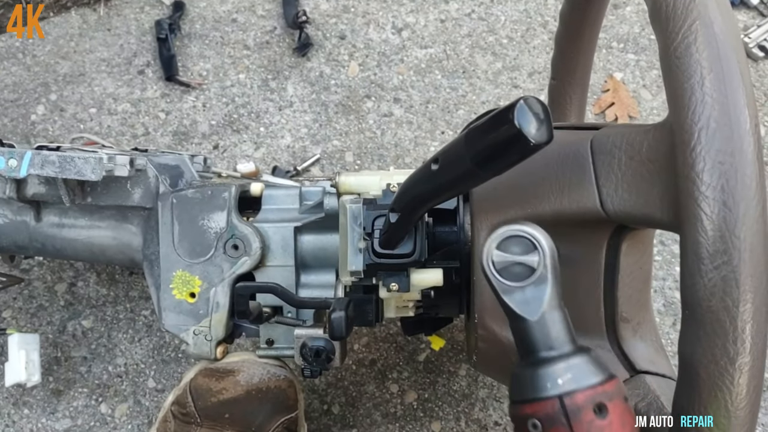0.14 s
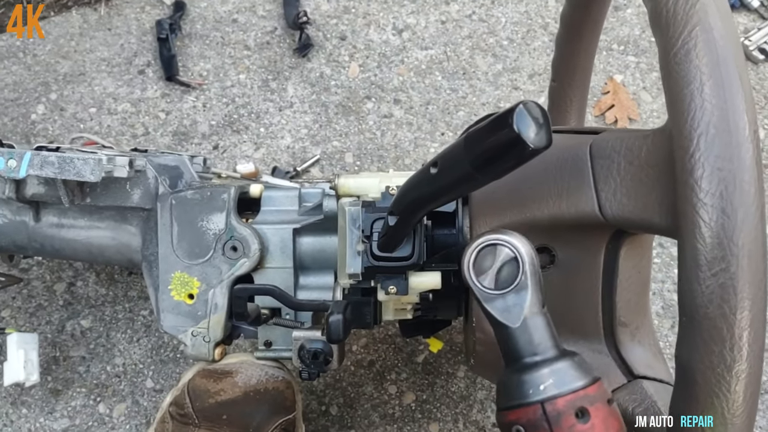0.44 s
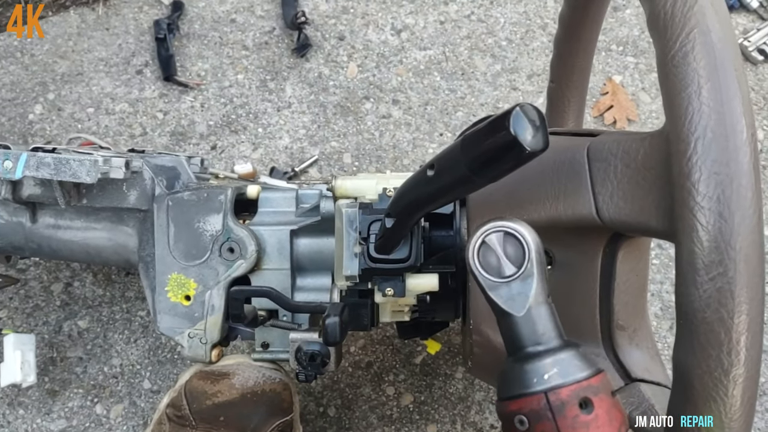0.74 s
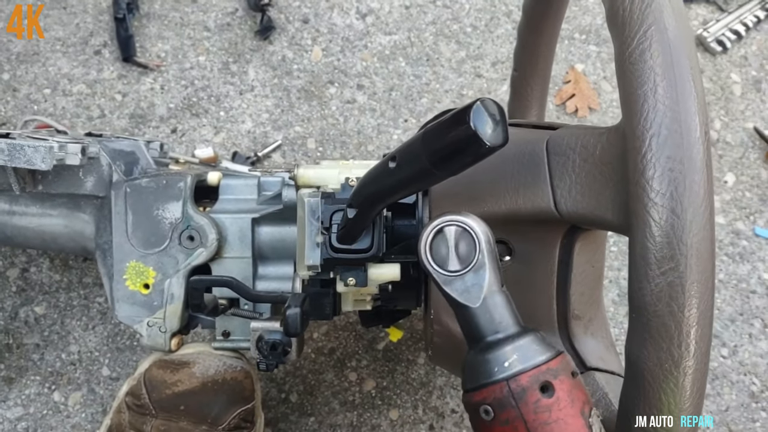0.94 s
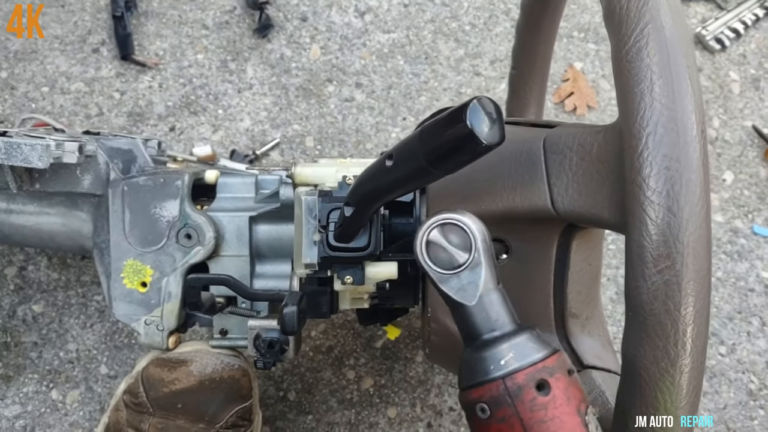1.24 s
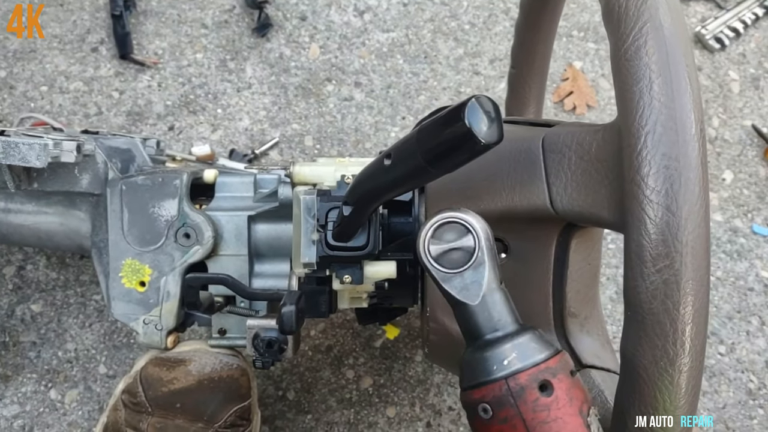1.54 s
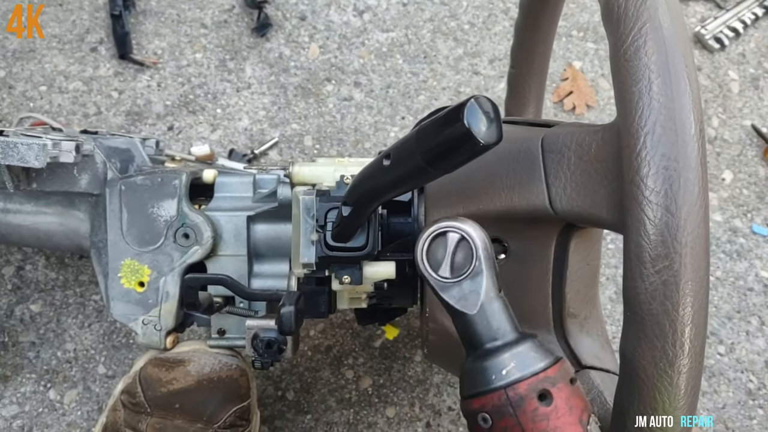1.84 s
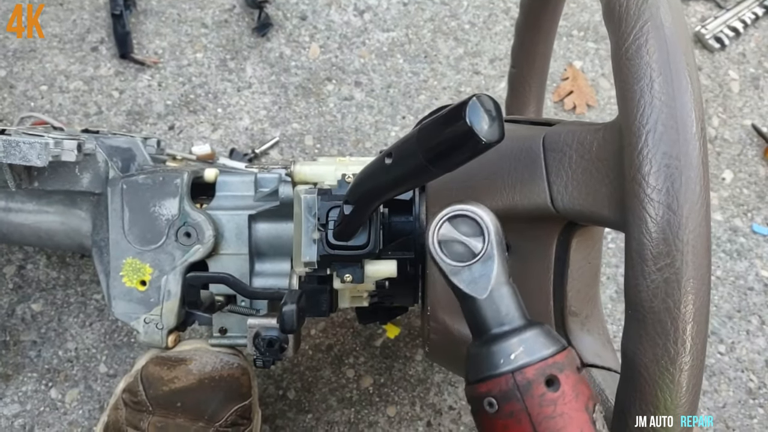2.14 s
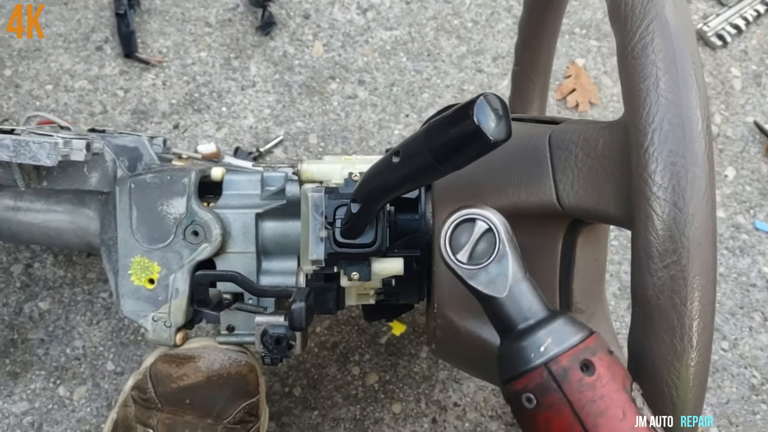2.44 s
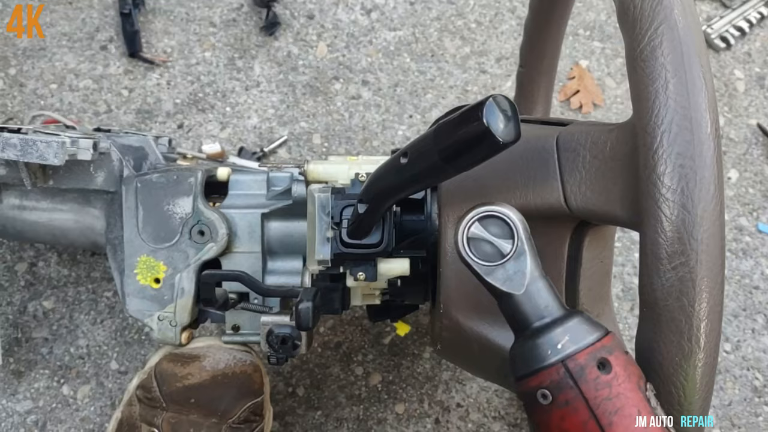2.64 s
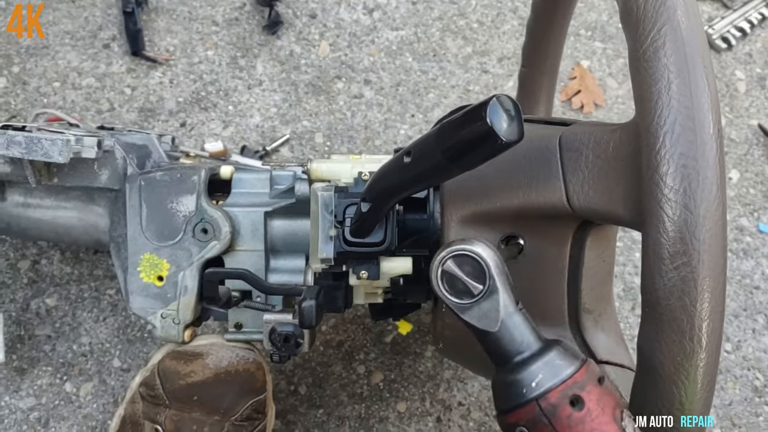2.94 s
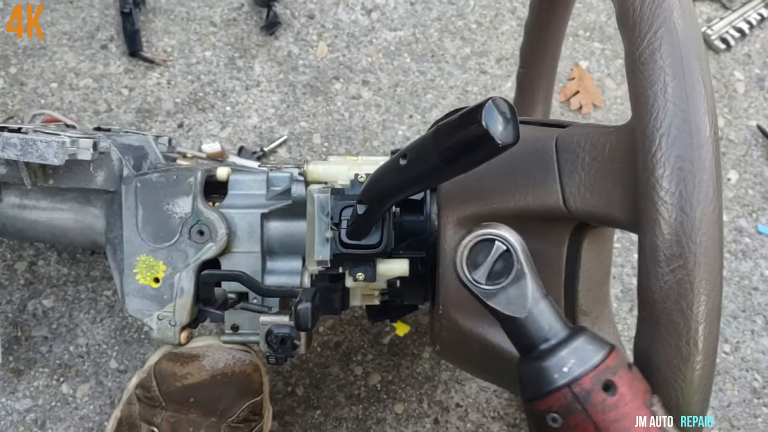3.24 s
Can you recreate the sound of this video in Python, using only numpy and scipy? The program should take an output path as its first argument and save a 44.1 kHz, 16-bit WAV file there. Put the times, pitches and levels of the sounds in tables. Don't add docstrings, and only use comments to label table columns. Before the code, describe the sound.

Close up outdoors, an electric ratchet makes a long harsh buzzing run, a short second burst and a third run that winds down to clattering knocks, over barely audible yard air, with little echo.

```python
import sys
import numpy as np
from scipy import signal
from scipy.fft import rfft, irfft, next_fast_len
from scipy.io import wavfile
from scipy.ndimage import uniform_filter1d

SR = 44100
rng = np.random.default_rng(int(sys.argv[2]) if len(sys.argv) > 2 else 0)


def gain_from_decibels(decibels):
    exponent = np.asarray(decibels, float) / 20
    return 10 ** exponent


def bounce(signal):
    frames = np.transpose(np.atleast_2d(signal))
    limited = np.clip(frames, -1, 1)
    pcm = np.round(limited * 32767).astype(np.int16)
    wavfile.write(sys.argv[1], SR, pcm)


N = 149940
SIZE = next_fast_len(N + 8192, True)
T, HZ = np.arange(N) / SR, np.fft.rfftfreq(SIZE, 1 / SR)


def evened(x):
    return x / np.sqrt(np.mean(x ** 2) + 1e-20)


def curve(points, axis=1):
    columns = np.transpose(points)
    return np.interp(T, columns[0], columns[axis])


def read(points):
    f, value = np.transpose(points)
    return np.interp(np.log(HZ + 1), np.log(f + 1), value)


def bell(hz, width):
    return 1 / np.sqrt(1 + (2 * (HZ - hz) / width) ** 2)


def colour(x, gain):
    return irfft(rfft(x, SIZE) * gain, SIZE)[..., :N]


def noise():
    return rng.standard_normal((2, N))


def drift(hz):
    return evened(colour(rng.standard_normal(N), bell(0, 2 * hz) ** 2))


def steps(count):
    return rng.standard_normal(4000)[count.astype(int) % 4000]


# [hz, level_db per Hz]
YARD_TONE = [(18, -32), (30, -7), (680, -5), (837, -9), (1200, -10), (1780, -8), (15000, -48)]


def yard():
    return gain_from_decibels(-57.5) * evened(colour(noise(), gain_from_decibels(read(YARD_TONE))))


# [time_s, speed_turns_per_s]
CRANK_SPEED = [(0.085, 0), (0.1, 31.36), (0.15, 59.87), (0.22, 75.76), (1.75, 75.81), (1.85, 65.24),
               (1.95, 48.37), (2.09, 35.29), (2.15, 69.0), (2.22, 75.13), (2.31, 74.37), (2.44, 51.65),
               (2.46, 77.25), (2.96, 77.15), (3.1, 54.88), (3.25, 33.21), (3.4, 17.88)]
# [time_s, drive_effort_db, yoke_slack_db, steel_rub_db]
LOAD = [(.096, -31, -4, 4), (.13, -30, 2, -2), (.2, -22, -20, -3.5), (.54, -21.5, -8, -4.5),
        (.63, -21.5, -2, -4.5), (1.82, -21, 2, -4), (1.87, -25.5, 6, 4), (2.1, -29, -13, 7),
        (2.115, -24, -4, 5), (2.31, -19, -1.5, -4.5), (2.335, -23.5, -3, -2), (2.44, -25, 5.5, 0),
        (2.47, -21.5, 8, -5), (2.82, -21.5, -20, -10), (2.87, -19.5, -2.5, -7), (3.07, -24, 6.5, -2),
        (3.1, -25.5, 4.5, 1), (3.4, -33, 7.5, 4)]


def crank():
    speed = curve(CRANK_SPEED)
    effort_db = curve(LOAD) - 60 * (T < LOAD[0][0])
    return np.cumsum(speed) / SR, speed, effort_db


# [pitch_hz, level_db]
SWITCH_WHINE = [(3688, -64), (4926, -77), (5512, -70), (7364, -78), (9259, -88), (11025, -87), (12888, -83)]
# [time_s, level_db, length_s, centre_hz]
TRIGGER_TICKS = [
    (0.041, -57, .002, 4930),
    (.046, -49, 0.0073, 250),
    (0.069, -51, 0.0063, 6900),
    (0.086, -27.5, 0.0044, 4500),
    (.097, -25, .0015, 11000),
    (0.124, -25, 0.0015, 1450),
    (0.135, -19, 0.0025, 1180),
    (2.501, -23, 0.02, 1120),
]


def trigger():
    on_s, off_s, fade_s = 0.046, 0.066, 0.004
    whining = np.clip(np.minimum(T - on_s, off_s - T) / fade_s, 0, 1)
    whine = sum(gain_from_decibels(db + 3) * np.sin(2 * np.pi * hz * T) for hz, db in SWITCH_WHINE)
    out = whining * whine * np.ones((2, 1))
    for start_s, db, length_s, hz in TRIGGER_TICKS:
        tone = bell(hz, 0.9 * hz) ** 2 * np.minimum(2 * HZ / hz, 1) ** 2
        out += gain_from_decibels(db) * evened(colour(noise(), tone)) * np.exp(-((T - start_s) / length_s) ** 2)
    return out


# [centre_hz, width_hz]
SHAKE = [(53, 44), (80, 8.5), (115, 21)]
# [multiple of crank speed, level_db]
ORDERS = [(4, -51.5), (5, -54), (6, -46), (7, -45), (10, -46), (12, -41), (13, -42)]


def hum(turns, speed):
    shaky = turns + 0.012 * drift(hz=42)
    tones = np.zeros(N)
    for multiple, db in ORDERS:
        wave = np.sin(2 * np.pi * (multiple * shaky + rng.random()))
        tones += wave * gain_from_decibels(db + 4.5 * drift(hz=9))
    tones *= gain_from_decibels(-6 * (T > LEVEL_DIPS[-1][0]))
    shake = sum(evened(colour(noise(), bell(hz, width) ** 2)) for hz, width in SHAKE)
    return tones * (speed / speed.max()) ** 7 + shake * gain_from_decibels(-62.5)


# [pitch_hz, width_hz, level_db, share of effort, share of rub]
SINGING_PARTS = [(394, 163, -44.5, 0.094, 0.19), (486, 150, -49.5, 0.23, 1), (936, 410, -42, 0.19, 0.29),
                 (1530, 1200, -41, 0.14, 0.16), (7400, 320, -27.5, 0.82, 1), (12900, 1000, -34, 0.12, 1.2),
                 (13850, 700, -33, 0.36, 0.19), (13300, 10600, -29.5, 0.1, 0.82)]


def sing(speed, effort_db):
    stop_speed = 32
    started = np.clip((T - LOAD[0][0]) / 0.0095, 0, 1)
    running = started * np.where(T > 1, np.minimum(speed / stop_speed, 1), 1)
    strain_db, rub_db = effort_db - effort_db.max(), curve(LOAD, axis=3)
    out = np.zeros((2, N))
    for hz, width, db, effort_share, rub_share in SINGING_PARTS:
        flicker_db = 4 * drift(hz=69.5)
        tone = evened(colour(noise(), bell(hz, width) ** 2))
        out += running * tone * gain_from_decibels(db + effort_share * strain_db + rub_share * rub_db + flicker_db)
    return out


# [pitch_hz, level_db, t60_s]
YOKE_RINGS = [(410, -18.5, 0.011), (914, -2.5, 0.025), (1140, -4, 0.015), (1450, -7.5, 0.0049),
              (1890, -0.5, 0.023), (2810, -6.5, 0.0056), (2960, -11, 0.013), (3750, -5, 0.0034),
              (5260, -10, 0.0028), (7170, 5, 0.011), (10800, -17, 0.0042), (12500, 5, 0.0046),
              (14600, -11, .004)]


def knock(turns, speed):
    knock_db, burst_s, ring_spread_db = -32, 0.0051, 3.5
    off_s = (turns - np.round(turns)) / (speed + 1e-3)
    burst = np.exp(-(off_s / burst_s * 2) ** 2) * (turns > 0.5)
    burst = burst * gain_from_decibels(knock_db + curve(LOAD, axis=2))
    t, out = T[:2000], np.zeros((2, N))
    for hz, db, t60 in YOKE_RINGS:
        ring = gain_from_decibels(-60 * t / t60) * np.sin(2 * np.pi * hz * t)
        ring = ring / np.linalg.norm(ring)
        drive = burst * gain_from_decibels(db + ring_spread_db * steps(turns + 0.5)) * noise()
        out += signal.oaconvolve(drive, ring[None], axes=1)[:, :N]
    return colour(out, np.minimum(HZ / 330, 1) ** 3)


# [hz, level_db per Hz]
GRIND_TONE = [(200, -43), (400, -18.5), (900, -11.5), (2200, -5.5), (4300, -0.5), (7900, -1), (8600, -13.5),
              (15500, -8.5)]
# [centre_hz, width_hz, lift_db]
HOUSING_RINGS = [(395, 450, 5), (616, 76, -12), (895, 83, 7.5), (1450, 225, 7), (2446, 310, 6),
                 (3050, 1200, -0.5), (3585, 420, 4), (4000, 70, 3.5), (4530, 1200, 2)]


def grind(turns, speed, effort_db):
    grind_db, teeth = 5.5, 12
    angle = 2 * np.pi * turns
    beat_db = 1.5 * np.cos(angle) + np.cos(2 * angle) + np.cos(3 * angle)
    beat_db = beat_db * (1 + 0.9 * (1 - speed / speed.max()))
    tooth_db = 2 * uniform_filter1d(steps(turns * teeth), 12)
    force = gain_from_decibels(effort_db + beat_db + tooth_db + 0.5 * drift(hz=38.6))
    lift_db = sum(db * bell(hz, width) ** 2 for hz, width, db in HOUSING_RINGS)
    body = gain_from_decibels(read(GRIND_TONE) + lift_db) * np.minimum(HZ / 200, 1) ** 2
    return gain_from_decibels(grind_db) * colour(force * noise(), body / np.sqrt(np.mean(body ** 2)))


def patchy(x, spread_db):
    z = signal.stft(x, nperseg=256)[2]
    field = rng.standard_normal(z.shape[1:])
    field = uniform_filter1d(field, size=5, axis=0)
    field = evened(uniform_filter1d(field, size=50, axis=1))
    return signal.istft(z * gain_from_decibels(spread_db * field), nperseg=256)[1][:, :N]


# [hz, left_minus_right_db]
PORT_BALANCE = [(250, 1.5), (740, 7.5), (2300, 4.5), (3100, -1), (5000, 3), (7000, -5.5), (9500, -15),
                (12000, 0)]
# [hz, likeness 0 to 1]
PORT_LIKENESS = [(60, 0.99), (450, 0.65), (1200, 0.64), (3300, 0.5), (5500, 0.6), (9000, 0.075)]


def ports(pair):
    left_lag_s = 4e-5
    a, b = rfft(pair, SIZE)
    same = np.clip(read(PORT_LIKENESS), 0, 1)
    tilt = gain_from_decibels(read(PORT_BALANCE) / 2)
    norm = np.sqrt(2 / (tilt ** 2 + tilt ** -2))
    left = a * tilt * np.exp(-2j * np.pi * HZ * left_lag_s)
    right = (same * a + np.sqrt(1 - same ** 2) * b) / tilt
    return irfft(norm * np.array([left, right]), SIZE)[:, :N]


def scene():
    turns, speed, effort_db = crank()
    background = yard() + trigger() + hum(turns, speed)
    tool = sing(speed, effort_db) + knock(turns, speed)
    tool = tool + patchy(grind(turns, speed, effort_db), spread_db=1.5)
    return ports(background + tool)


def band_limit(x):
    return signal.sosfilt(signal.butter(12, 17090, fs=SR, output="sos"), x)


# [time_s, depth_db, fade_in_s]
LEVEL_DIPS = [
    (.8935, -14, 0.014),
    (2.443, -6.5, 0.023),
]


def record(dry):
    ceiling, low_hz, edge_hz = 0.8, 45, 15840
    gain_db = sum(db * (T > s) * np.clip(1 - (T - s) / fade_s, 0, 1) for s, db, fade_s in LEVEL_DIPS)
    band = np.clip((edge_hz - HZ) / 150, 0, 1) / np.sqrt(1 + (low_hz / (HZ + 1)) ** 6)
    limited = ceiling * np.tanh(dry / ceiling)
    return band_limit(colour(limited * gain_from_decibels(gain_db), band))


dry = scene()
out = record(dry)
bounce(out)
```